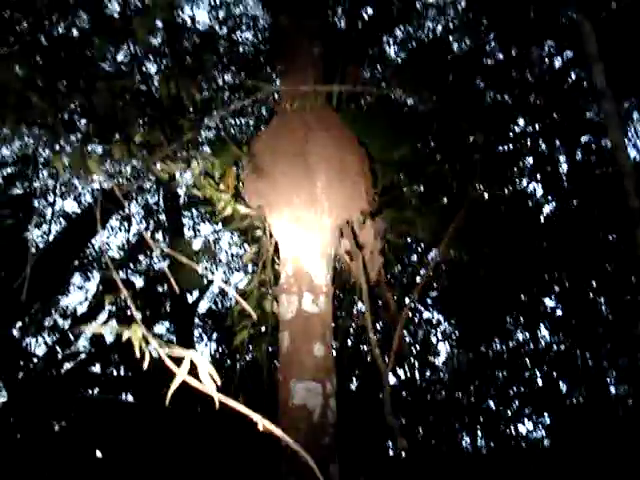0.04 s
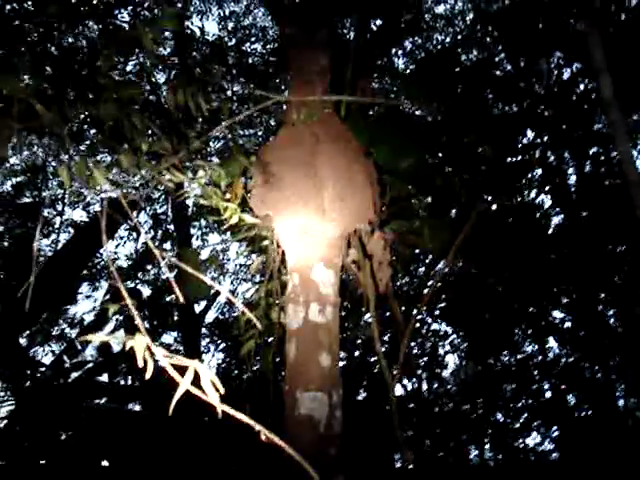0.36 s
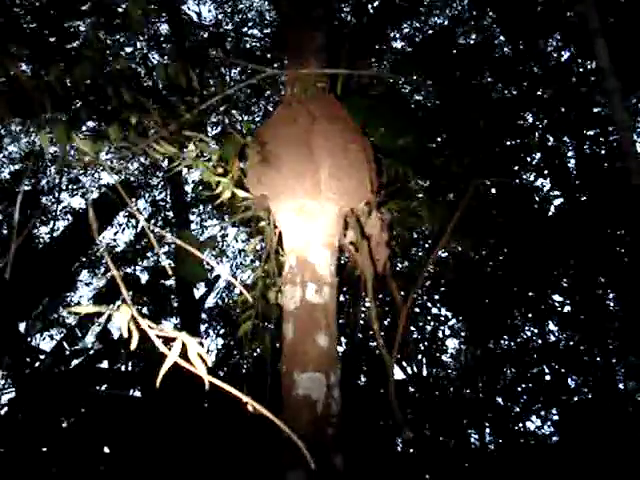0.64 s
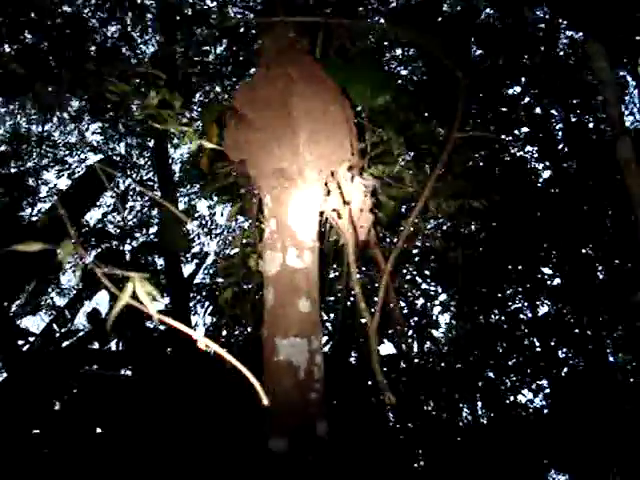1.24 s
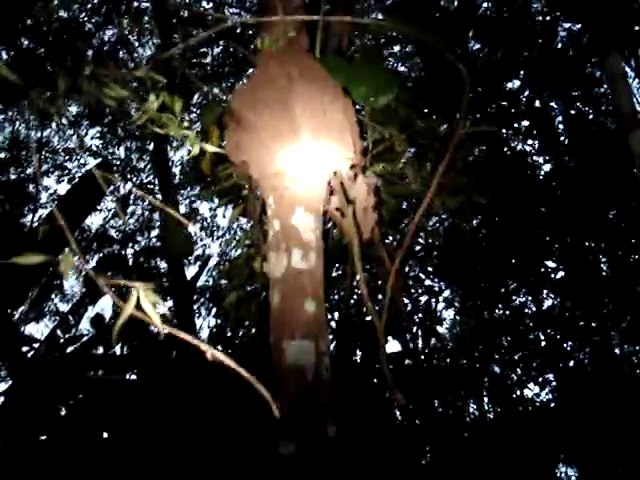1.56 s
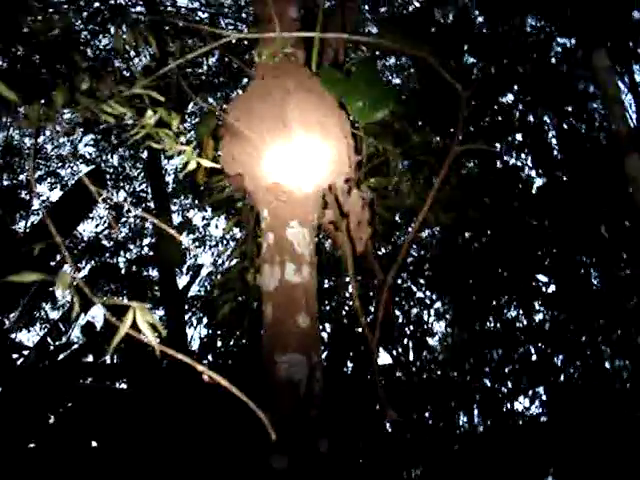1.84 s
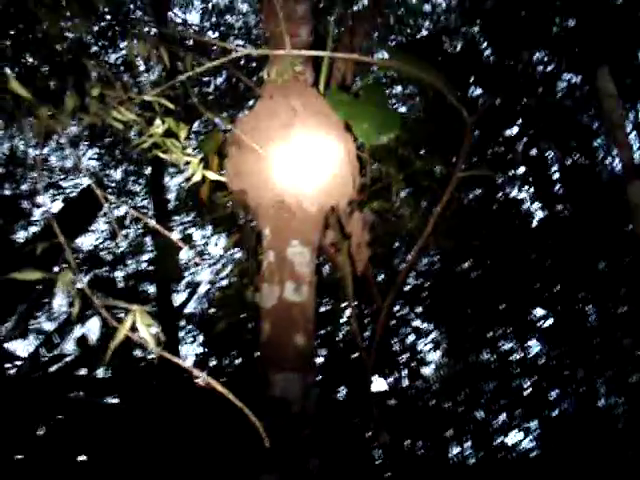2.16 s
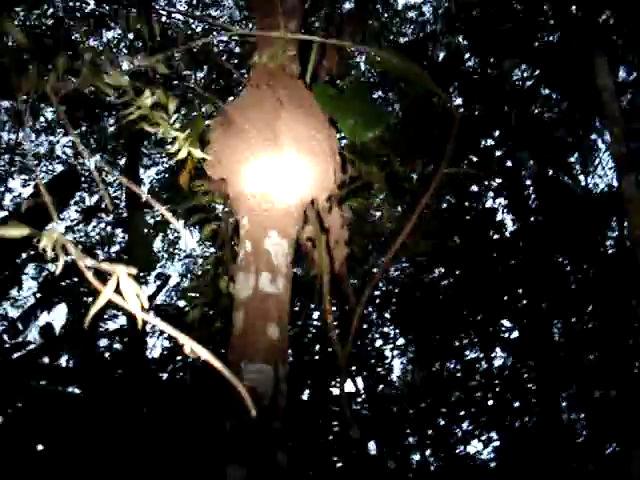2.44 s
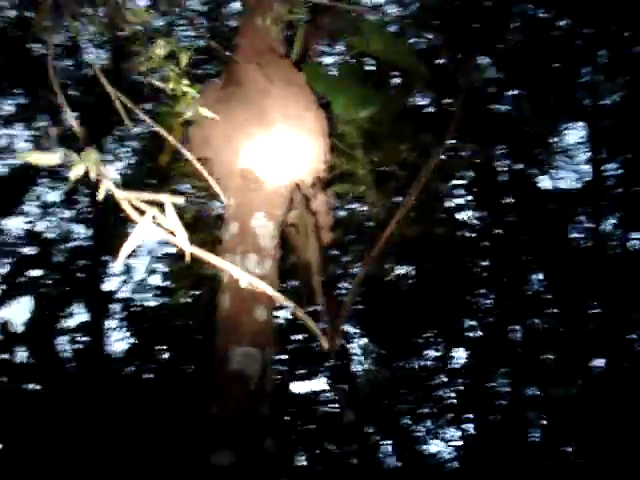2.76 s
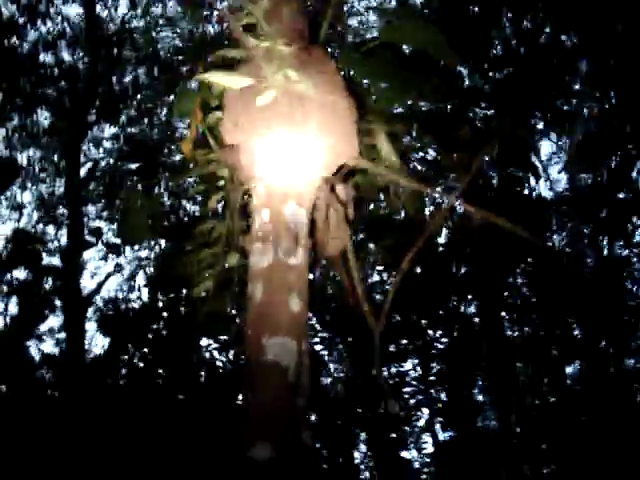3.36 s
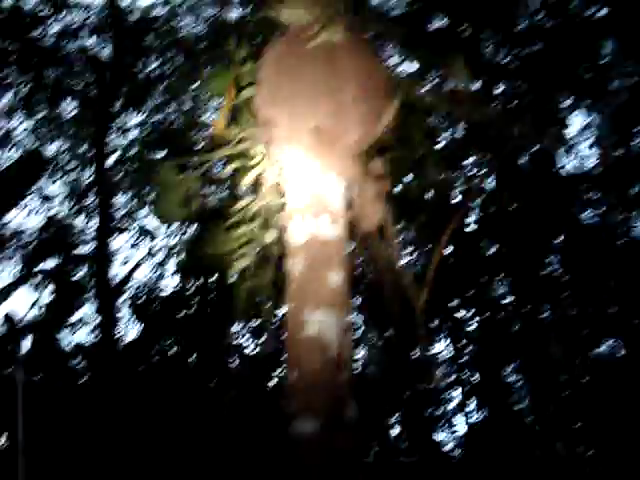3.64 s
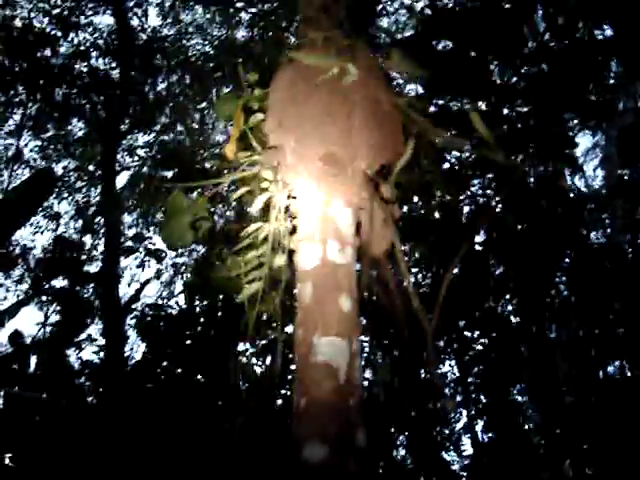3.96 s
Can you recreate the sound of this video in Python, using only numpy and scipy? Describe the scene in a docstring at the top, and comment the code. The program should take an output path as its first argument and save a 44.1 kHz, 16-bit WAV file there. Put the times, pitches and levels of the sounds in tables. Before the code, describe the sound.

Rain falling steadily on trees, with a short crackling rustle of leaves close by.

```python
"""Steady rain hisses on a forest: countless far drops blur together, and nearer ones patter faintly.
Leaves stir softly, a few drops tap on leaves close by, and the microphone takes a few soft bumps.
Past the middle, a leafy twig is pushed aside: it rustles twice and flicks past, as its stems rub
and its leaves slide, crackle and snap past one another."""
import sys
import numpy as np
from scipy import signal
from scipy.io import wavfile

SR = 44100
rng = np.random.default_rng(int(sys.argv[2]) if len(sys.argv) > 2 else 0)


def transcribe(u):
    """Save the signal u as a 16-bit wav file named by the first command-line argument.

    u: samples, shape (n,) or (channels, n), limited to [-1, 1]; the rate is SR.
    q: integer samples, one column per channel.
    """
    v = np.clip(np.atleast_2d(u).T, -1, 1)
    q = np.round(v * 32767).astype(np.int16)
    wavfile.write(sys.argv[1], SR, q)


N = 176400  # 4 seconds

# Tone of the far rain. Each row: pitch in Hz, relative strength in dB.
FAR_RAIN_TONE = [(25, -29.5), (60, -27.5), (110, -19), (170, -16), (260, -8.5), (400, -4), (650, -0.5),
                 (950, 1.5), (1400, -0.5), (2400, -1), (3400, -4), (5300, -6.5), (7000, -10.5), (9000, -13),
                 (10500, -45.5)]
# Loudness of the far rain. Each row: time in seconds, level in dB.
FAR_RAIN_LEVEL = [(0, -27), (1.2, -27), (2.3, -26.5), (3.1, -26.5), (3.47, -28), (3.68, -26), (4, -26.1)]
# Tone of the nearer drops. Each row: pitch in Hz, relative strength in dB.
PATTER_TONE = [(200, -12), (600, -3), (1200, -2), (3000, -5.5), (6000, -7), (10000, -14.5)]
# Tone of the crisp leaves. Each row: pitch in Hz, relative strength in dB.
CRACKLE_TONE = [(400, -19), (1500, -6.5), (2800, -3.5), (4300, 1), (6000, 2), (7500, -3.5), (10000, -7.5)]
# Loudness of the leaves, a faint stir at first. Each row: time in seconds, level in dB.
LEAF_LEVEL = [(0.7, -54), (1.25, -37.5), (1.55, -52), (2.1, -41.5), (2.58, -41), (2.65, -30), (2.74, -30.5),
              (2.79, -24.5), (2.88, -24.5), (2.99, -30.5), (3.10, -36), (3.135, -23.5), (3.18, -26),
              (3.25, -31), (3.32, -28), (3.38, -41), (4, -46)]
# Drops on close leaves. Each row: start in seconds, tick level in dB, tick pitch in Hz, plop level in dB.
CLOSE_DROPS = [(1.019, -15, 4900, -30), (1.182, -20, 5500, -28), (1.203, -21, 7000, -34),
               (1.292, -19, 5000, -17), (1.358, -21, 4500, -26), (1.941, -17.5, 5800, -25),
               (2.0922, -13, 6430, -12.5), (2.214, -18, 7650, -38), (3.235, -18, 4500, -16.5),
               (3.280, -28, 5000, -19)]
# Notes of a struck leaf. Each row: pitch in Hz, relative level in dB, fade time in seconds.
LEAF_NOTES = [(590, -5, .02), (714, -4, 0.01), (977, -4, 0.021), (1390, -7.5, 0.024), (2300, -7.5, 0.0096)]
# Soft bumps on the microphone. Each row: start in seconds, level in dB, pitch in Hz.
MIC_BUMPS = [(1.181, -31, 70), (1.871, -33, 48), (2.732, -34, 42), (2.810, -37, 85), (2.835, -40, 36),
             (3.147, -26.5, 52)]
# Tone of the rubbing stems. Each row: pitch in Hz, relative strength in dB.
RUB_TONE = [(120, -22), (350, -3), (900, 0), (1800, 3), (3000, -4), (6000, -13), (10000, -18.5)]
# Loudness of the rubbing stems. Each row: time in seconds, level in dB.
STEM_LEVEL = [(2.56, -52), (2.67, -29), (2.73, -30), (2.79, -27), (2.90, -28), (2.97, -39), (3.06, -37),
              (3.12, -32), (3.17, -42), (3.24, -28), (3.33, -44)]
# Leaves snapping free. Each row: start in seconds, level in dB, pitch in Hz.
LEAF_SNAPS = [(2.621, -11, 5500), (2.649, -9, 4000), (2.662, -6.5, 2200), (2.767, -13, 3000),
              (2.777, -3.5, 4000), (2.8165, -11, 4000), (2.853, -11, 5500), (2.927, -19, 5000),
              (3.111, -8, 2540), (3.119, -9, 6000), (3.1322, -11, 4480), (3.139, -15, 4500),
              (3.1498, -4.5, 3800), (3.200, -11, 5500)]

CUTOFF_HZ = 10030


def from_db(db):
    """Turn decibels into a number to multiply by."""
    return 10 ** (np.asarray(db) / 20)


def rms_one(x):
    """Scale a sound so its average size (rms) is 1."""
    return x / np.sqrt(np.mean(x ** 2) + 1e-20)


def level_curve(rows):
    """Loudness that glides between rows of seconds and dB."""
    return from_db(np.interp(np.arange(N) / SR, *np.transpose(rows)))


def drift(rate):
    """A slow random wander of about size 1; a higher rate moves faster."""
    r = np.exp(-80 * np.pi * rate / SR)
    noise = rng.standard_normal(N // 40 + 2002)  # one value per 40 samples
    slow = signal.lfilter([1], [1, -2 * r, r * r], noise)[2000:]
    return np.interp(np.arange(N) / 40, np.arange(len(slow)), rms_one(slow))


def bands(tone):
    """Filters a third of an octave wide, each with its strength from a tone table."""
    edges = 20 * 2 ** (np.arange(29) / 3)
    hz, db = np.transpose(tone)
    for low, high in zip(edges, edges[1:]):
        gain = from_db(np.interp(np.log(low * high) / 2, np.log(hz), db))
        yield signal.butter(2, [low, high], "band", fs=SR, output="sos"), gain


def hiss(tone, flicker_db):
    """Smooth noise whose bands each flicker a little."""
    white = rng.standard_normal((2, N))
    return rms_one(sum(gain * from_db(flicker_db * drift(rate=9.3)) * signal.sosfilt(band, white[k % 2])
                       for k, (band, gain) in enumerate(bands(tone))))


def grains(tone, per_s, spread_db, colour_db):
    """Tiny hits at random times, each with its own size and tone colour."""
    starts = np.flatnonzero(rng.random(N) < per_s / SR)
    sizes = from_db(spread_db * np.minimum(rng.exponential(1, N), 4)) * rng.choice([-1, 1], N)
    out = np.zeros(N)
    for band, gain in bands(tone):
        hits = np.full(N, 1e-18)
        hits[starts] = sizes[starts] * from_db(colour_db * rng.uniform(-1.1, 1, N)[starts])
        out += gain * signal.sosfilt(band, hits)
    return rms_one(signal.sosfilt(signal.butter(2, 160, "high", fs=SR, output="sos"), out))


def clicks(seconds, db):
    """One click at each given time."""
    out = np.zeros(N)
    out[np.clip((np.atleast_1d(seconds) * SR).astype(int), 0, N - 1)] = from_db(db)
    return out


def ring(hits, hz, fade_s):
    """Each click starts a pure note that fades by 60 dB in fade_s seconds."""
    decay, turn = from_db(-60 / (fade_s * SR)), 2 * np.pi * hz / SR
    return signal.lfilter([0, np.sin(turn)], [1, -2 * decay * np.cos(turn), decay ** 2], hits + 1e-18)


def crack(hits, hz, width_hz, fade_s):
    """Each click lets out a fading puff of noise in one broad band."""
    upper = np.hypot(hz, width_hz / 2) + width_hz / 2
    band = signal.butter(2, [hz ** 2 / upper, min(upper, SR / 2 - 1)], "band", fs=SR, output="sos")
    fade = signal.lfilter([1], [1, -from_db(-60 / (fade_s * SR))], hits + 1e-18)
    return .5 * fade * rms_one(signal.sosfilt(band, rng.standard_normal(N)))


def rain():
    """Far drops merge into a hiss, with nearer ones pattering on top."""
    far = level_curve(FAR_RAIN_LEVEL) * hiss(FAR_RAIN_TONE, flicker_db=0.69)
    patter = from_db(-36.5) * grains(PATTER_TONE, per_s=500, spread_db=2.5, colour_db=11)
    return far + patter


def leaf_rustle(slide_share=0.32):
    """Moving leaves slide with a hiss and crackle brightly."""
    slide = np.sqrt(slide_share) * hiss(CRACKLE_TONE, flicker_db=0.5)
    crackle = np.sqrt(1 - slide_share) * grains(CRACKLE_TONE, per_s=1400, spread_db=4, colour_db=10.5)
    return level_curve(LEAF_LEVEL) * (slide + crackle)


def close_drops():
    """A drop ticks on a leaf and makes it ring briefly; the leaf is too small to give off bass."""
    starts, _, _, plop_db = np.transpose(CLOSE_DROPS)
    uneven_db = rng.normal(0, 4, (len(starts), len(LEAF_NOTES)))  # each drop mixes the notes its own way
    plops = sum(ring(clicks(starts, plop_db + db + uneven_db[:, k]), hz, fade_s)
                for k, (hz, db, fade_s) in enumerate(LEAF_NOTES))
    ticks = sum(crack(clicks(at, db), hz, width_hz=2400, fade_s=0.027) for at, db, hz, _ in CLOSE_DROPS)
    bass_cut = signal.butter(3, 460, "high", fs=SR, output="sos")
    return ticks + signal.sosfilt(bass_cut, plops)


def bumps(cycles=1.4):
    """Each bump on the microphone is one low swing that dies at once."""
    return -sum(ring(clicks(at, db), hz, fade_s=cycles / hz) for at, db, hz in MIC_BUMPS)


def stem_rub():
    """As the twig bends, stems and leaves rub in many tiny slips: a dull swish."""
    return level_curve(STEM_LEVEL) * grains(RUB_TONE, per_s=2500, spread_db=2.0, colour_db=4)


def leaf_snaps():
    """Leaves snap past one another, each with a short, sharp crack."""
    return sum(crack(clicks(at, db), hz, width_hz=3800, fade_s=0.0066) for at, db, hz in LEAF_SNAPS)


def scene():
    """Add all the sounds into one channel."""
    return (rain() + leaf_rustle() + close_drops() + bumps() + stem_rub() + leaf_snaps())[None]


def record(dry):
    """Cut away the highest treble steeply."""
    treble_cut = signal.firwin(701, CUTOFF_HZ, window=("kaiser", 9), fs=SR)
    return signal.fftconvolve(dry, treble_cut[None], mode="same")


dry = scene()
out = record(dry)
transcribe(out)
```